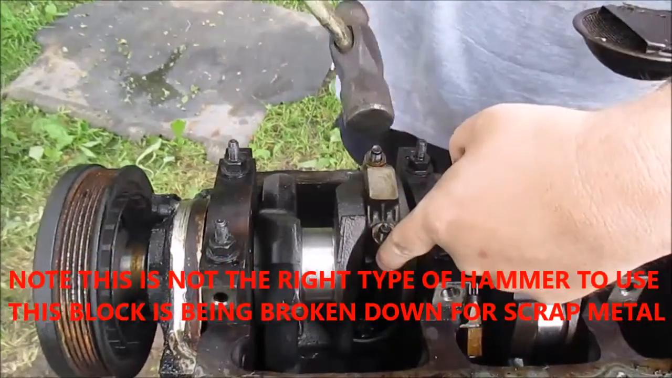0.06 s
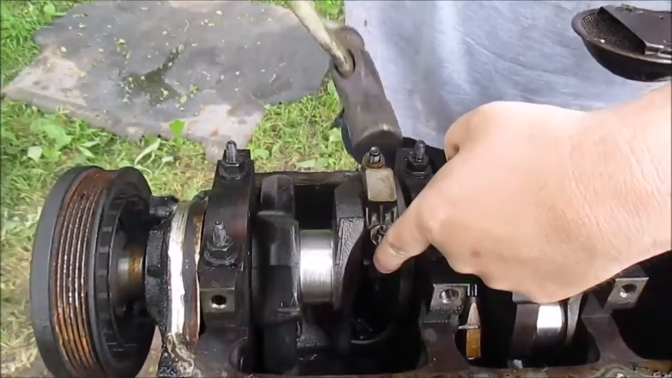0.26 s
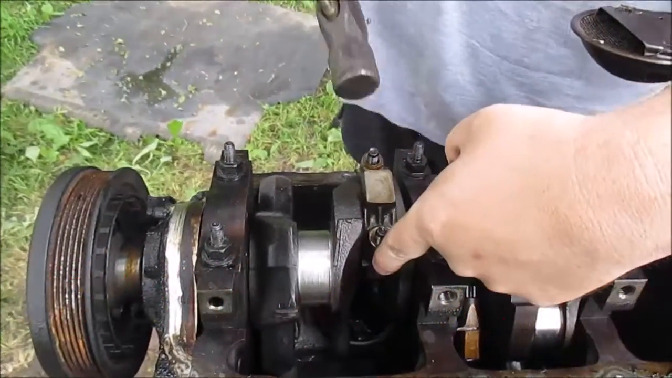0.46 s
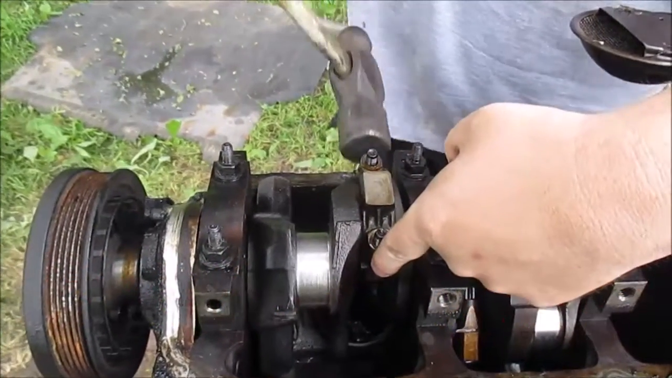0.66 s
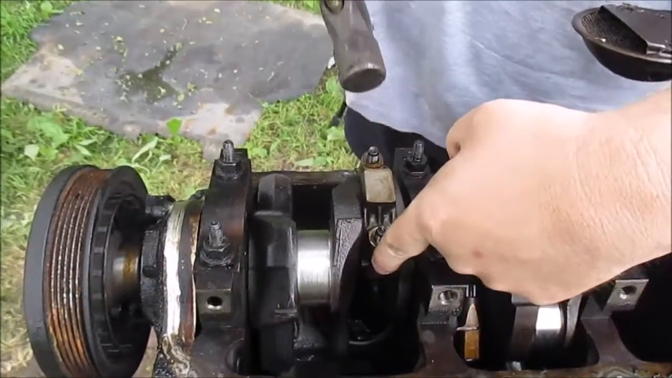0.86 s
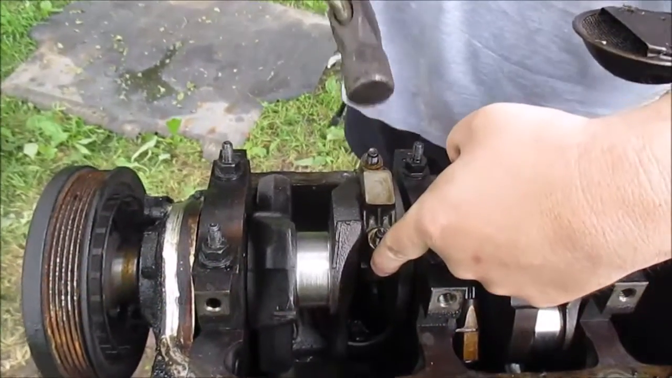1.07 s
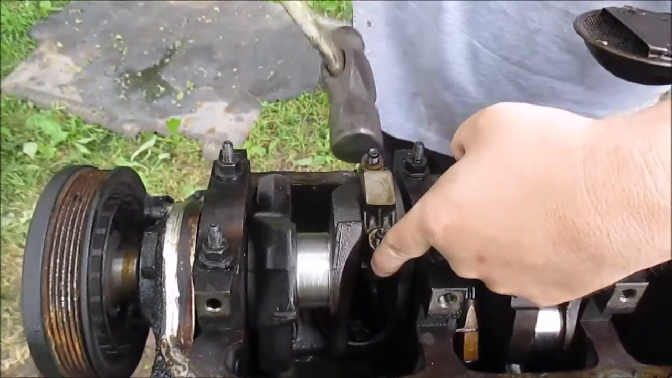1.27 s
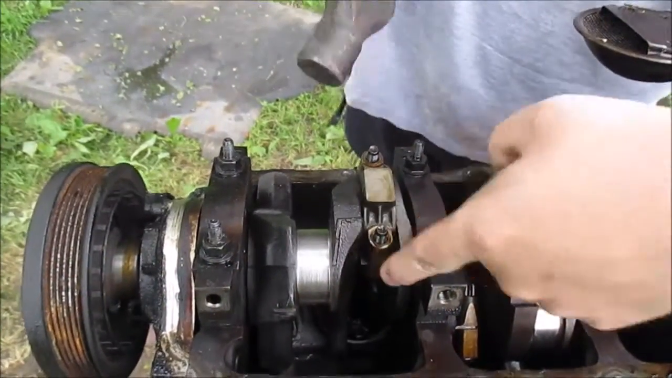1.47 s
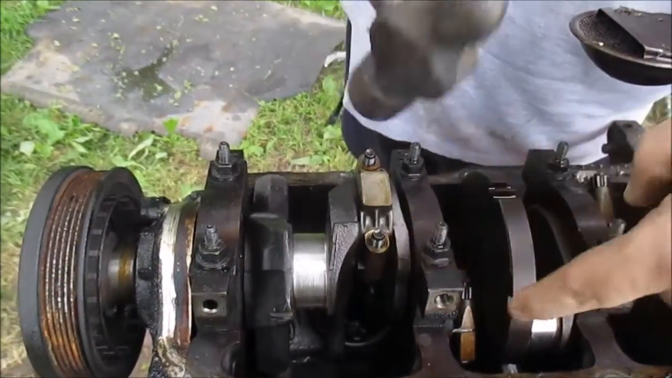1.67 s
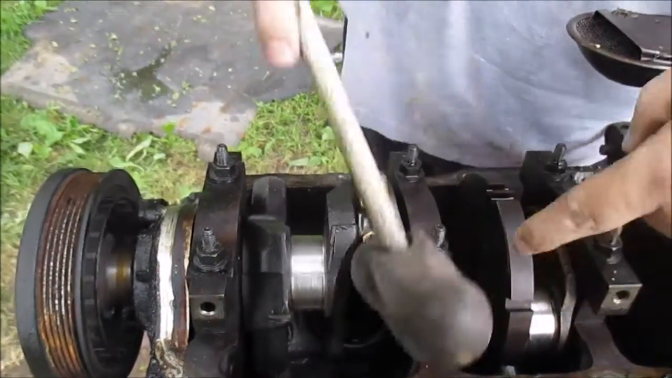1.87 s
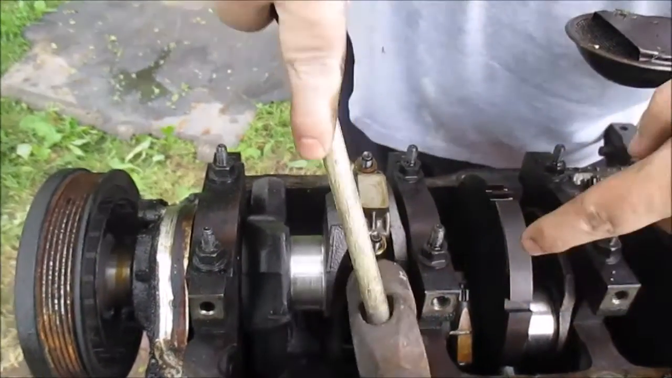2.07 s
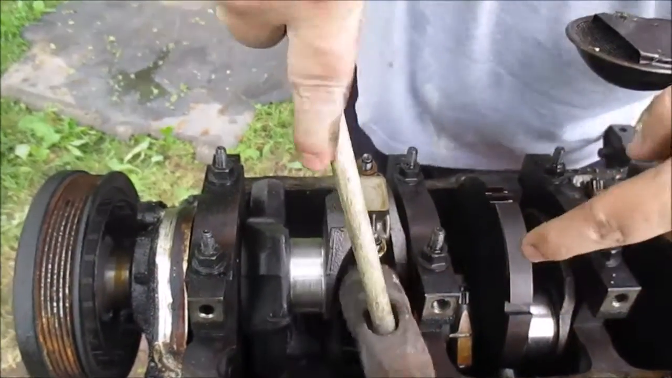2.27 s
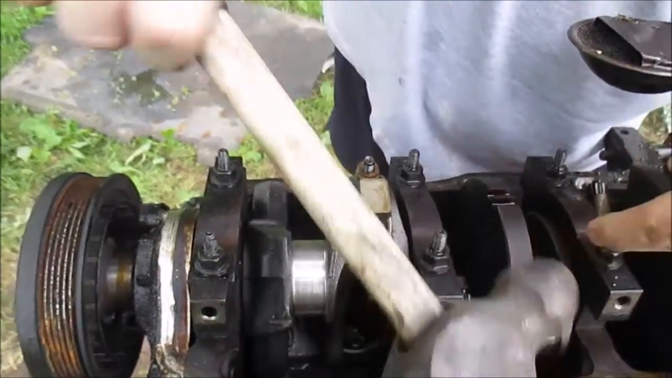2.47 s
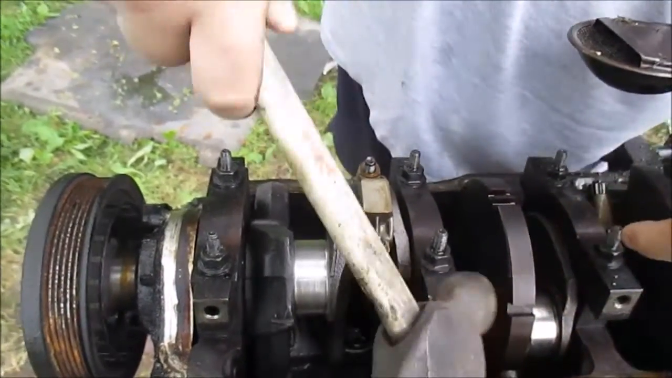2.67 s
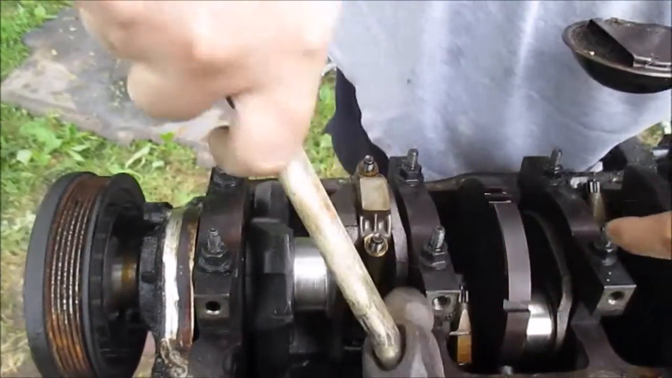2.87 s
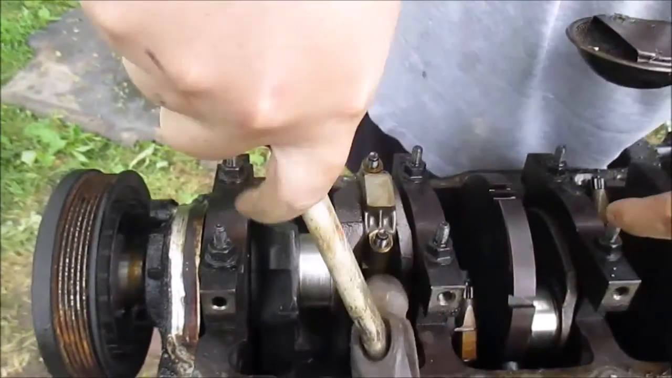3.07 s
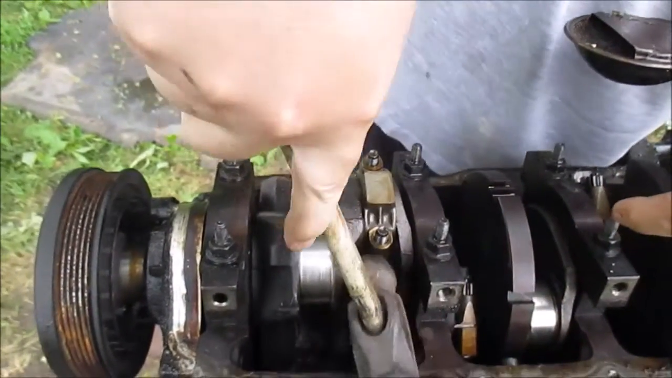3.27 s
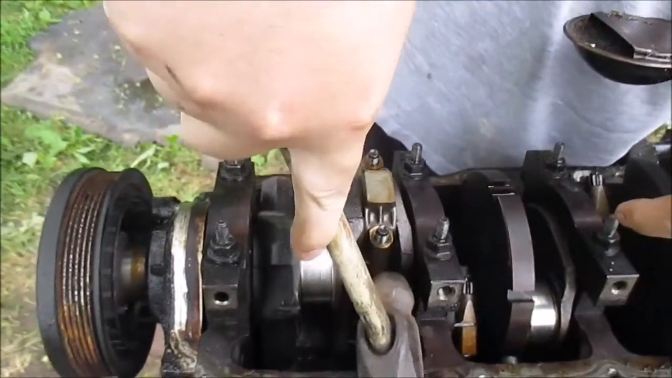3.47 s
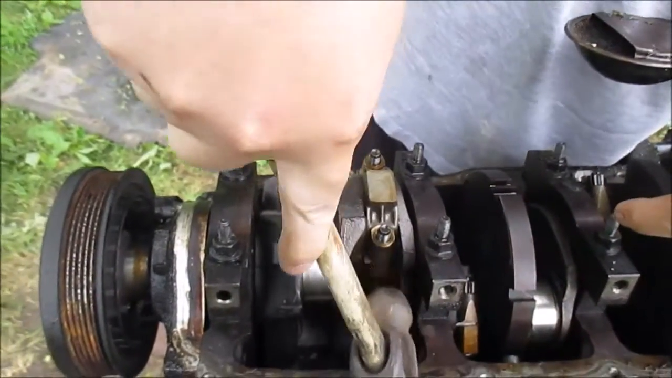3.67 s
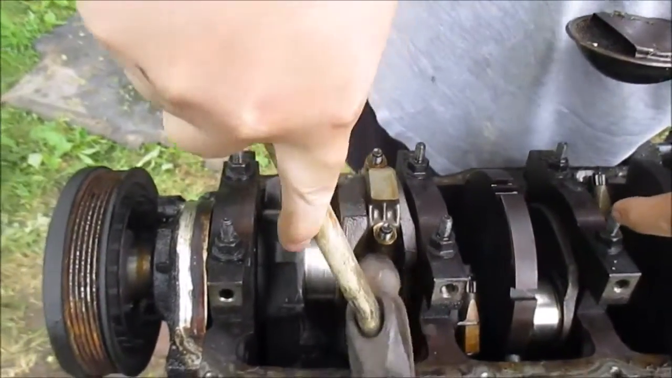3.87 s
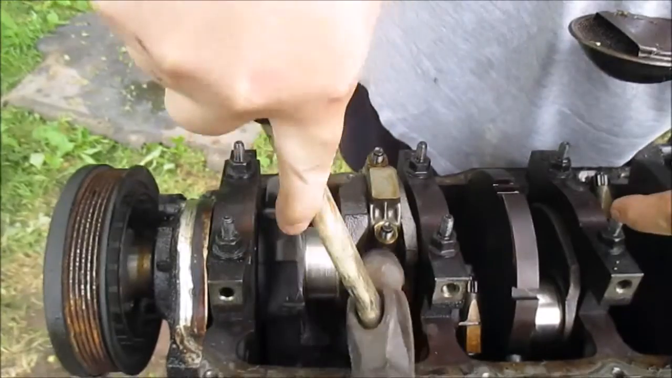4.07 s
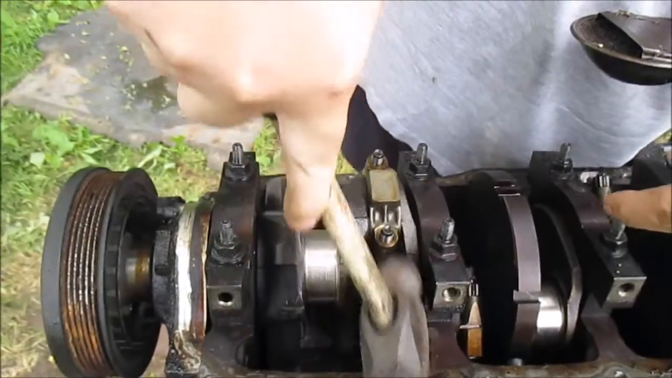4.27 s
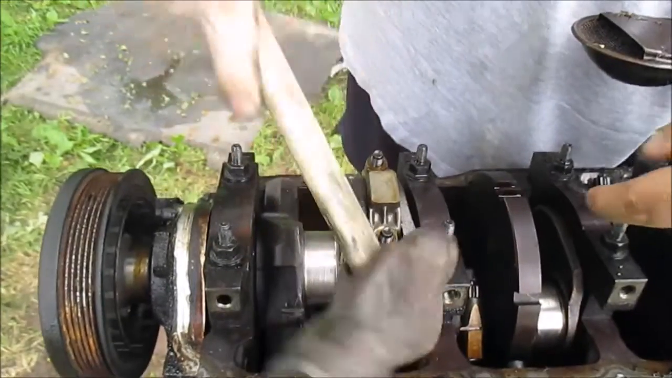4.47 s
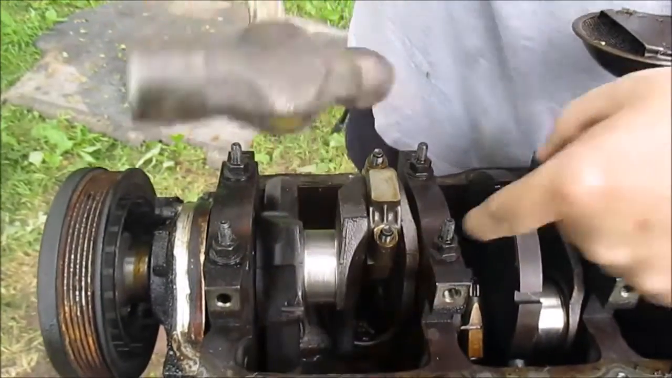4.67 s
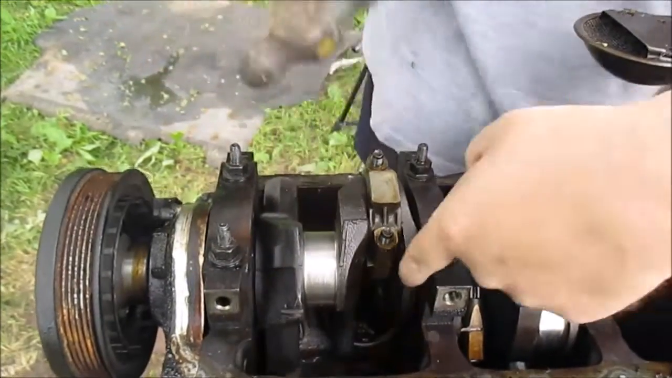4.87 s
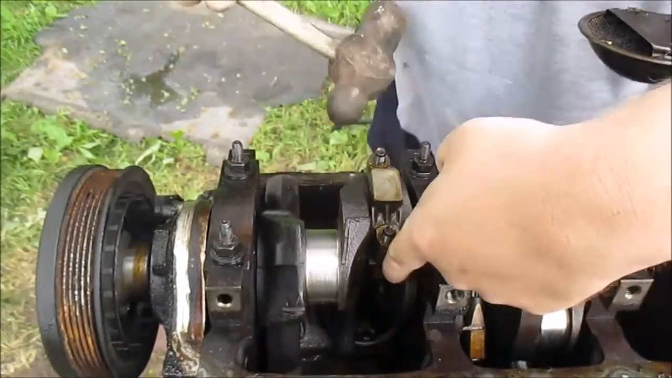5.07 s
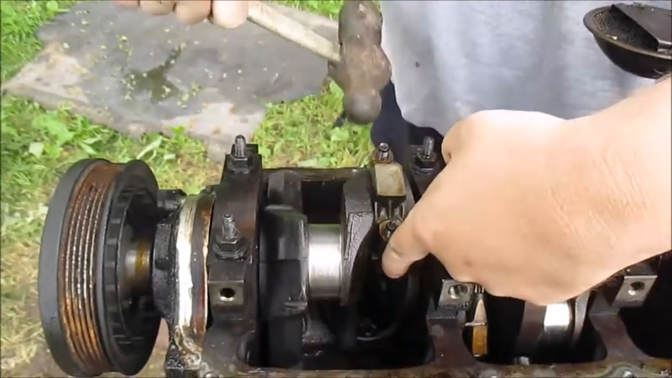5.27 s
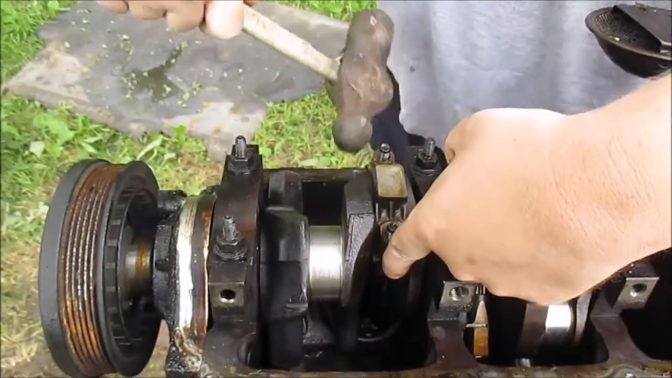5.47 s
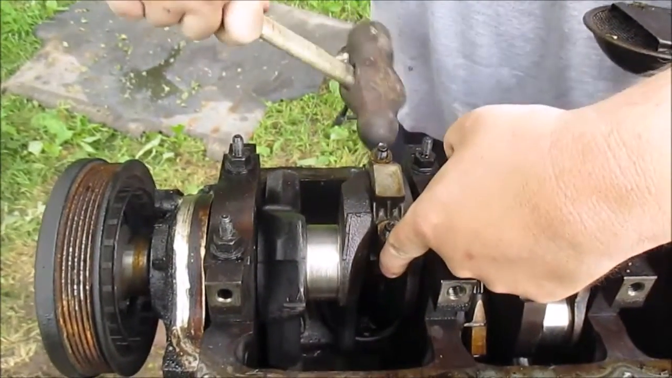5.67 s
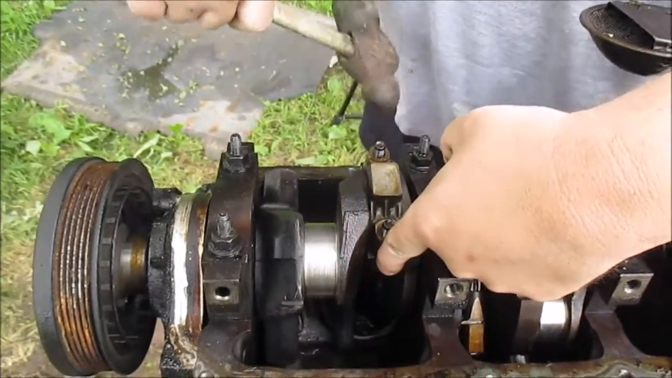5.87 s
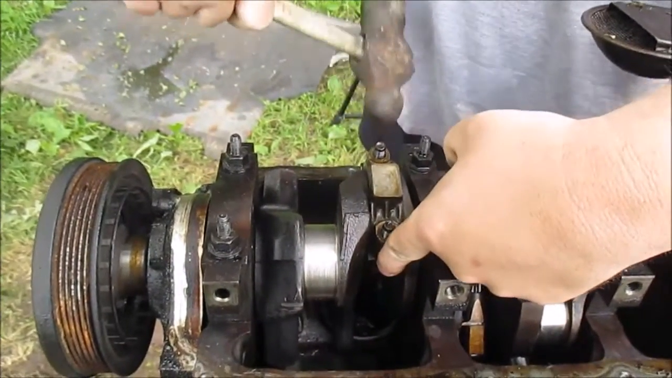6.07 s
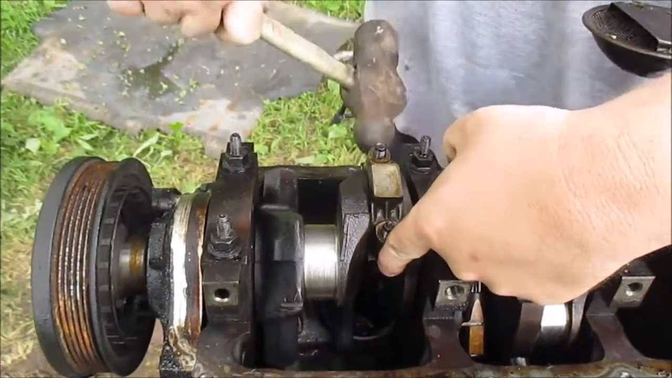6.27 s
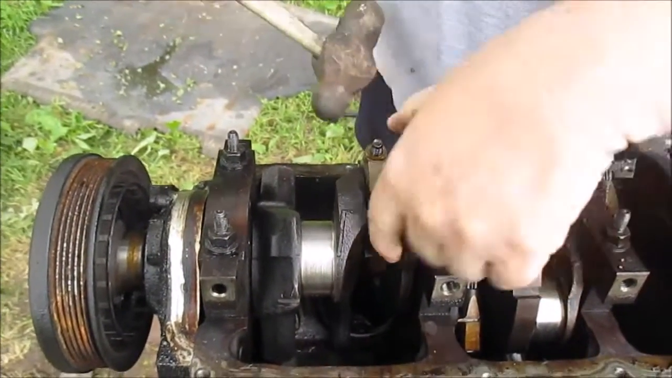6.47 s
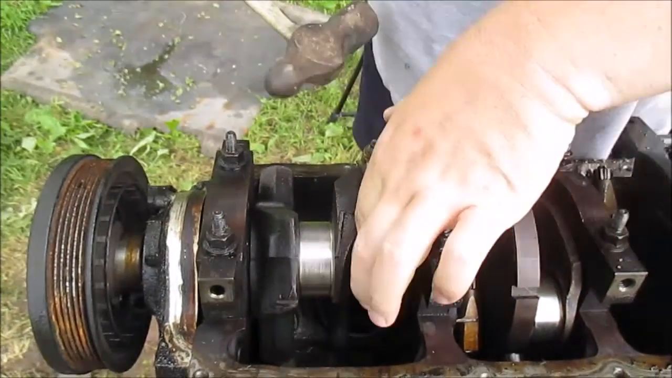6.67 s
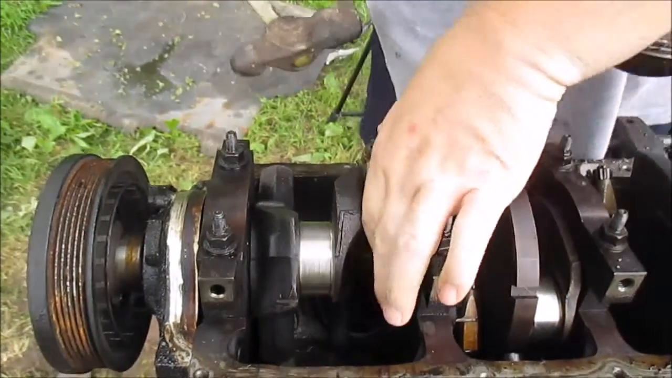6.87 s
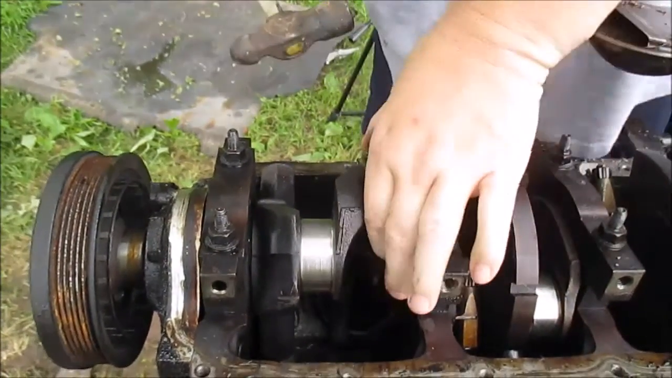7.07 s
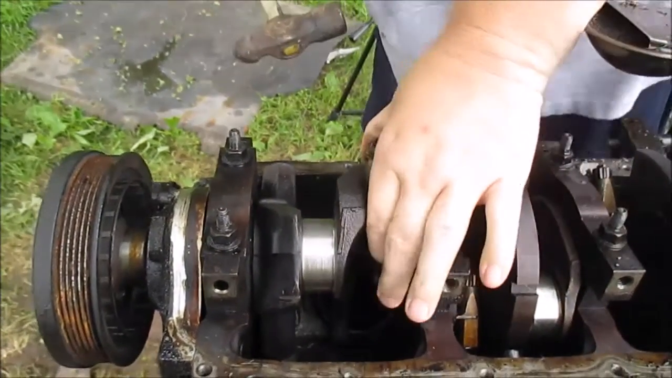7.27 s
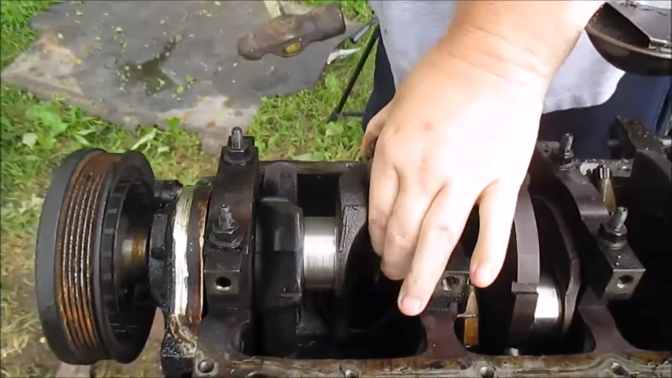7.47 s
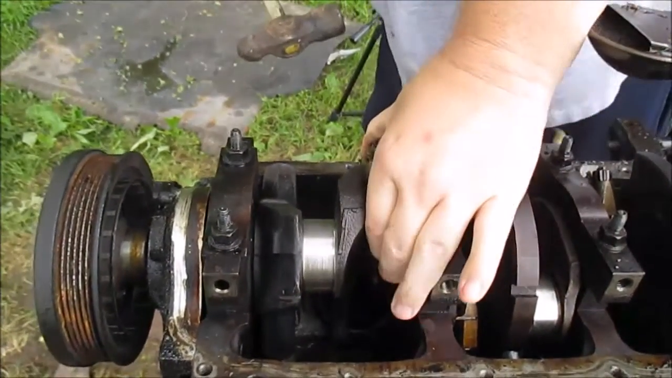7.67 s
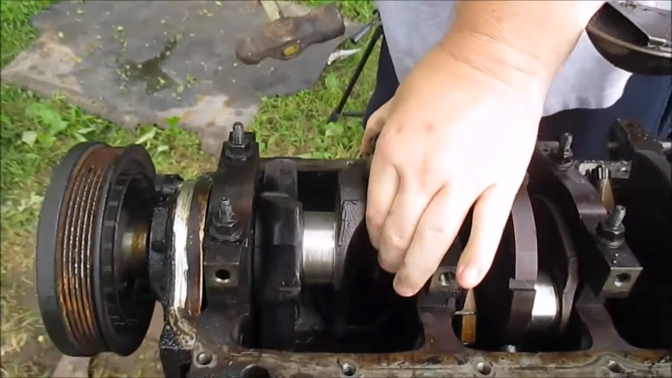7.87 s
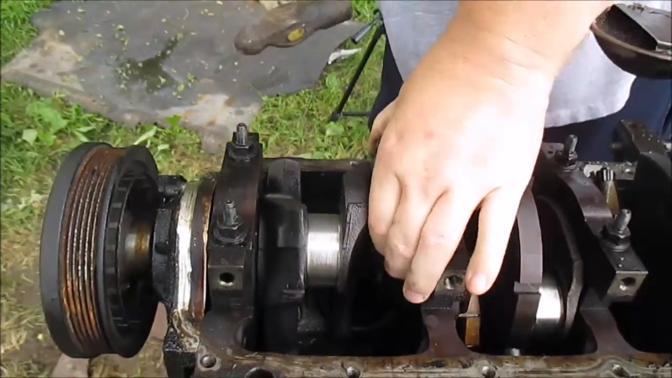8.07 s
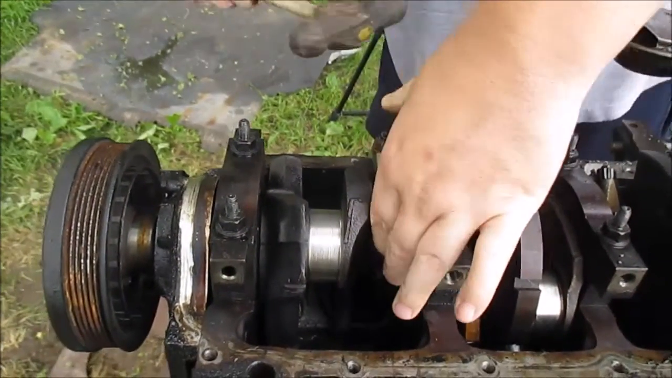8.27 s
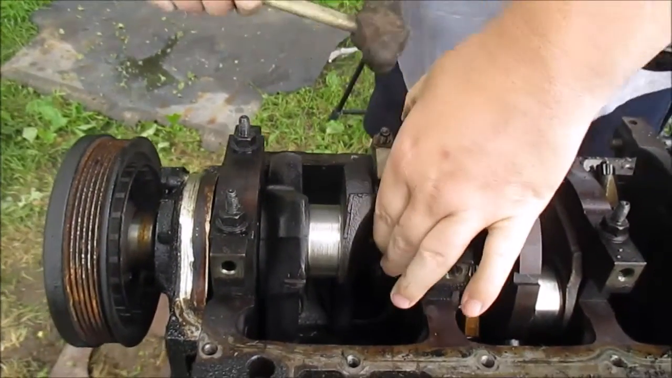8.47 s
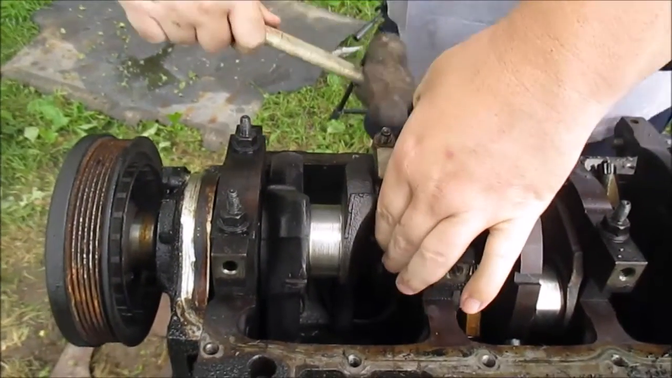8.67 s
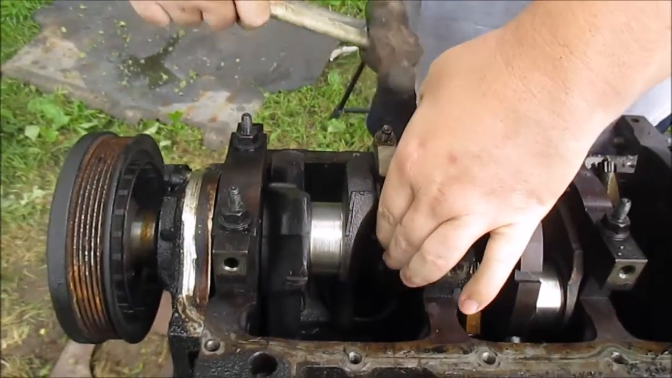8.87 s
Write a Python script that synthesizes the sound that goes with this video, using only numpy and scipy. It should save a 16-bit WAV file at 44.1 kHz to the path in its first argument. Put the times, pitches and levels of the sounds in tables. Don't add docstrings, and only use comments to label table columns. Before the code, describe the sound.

Short, dead metallic knocks of hammer on heavy iron, each a hard crack with a brief chattering tail and a faint thin ring. They arrive in evenly paced runs separated by pauses, varying from bright to thuddy. Soft hiss and rumble of distant traffic duck after the blows and creep back up; a faint bird whistles near the end. Close mono microphone, open air, no echo.

```python
import sys
import numpy as np
from scipy import signal
from scipy.io import wavfile
from scipy.ndimage import uniform_filter1d

SR = 44100
rng = np.random.default_rng(int(sys.argv[2]) if len(sys.argv) > 2 else 0)


def unload_audio(sound):
    columns = np.transpose(np.atleast_2d(sound))
    steps = np.round(np.clip(columns, -1, 1) * 32767)
    wavfile.write(sys.argv[1], SR, steps.astype(np.int16))


def makeup_ratio(level_db):
    decades = np.asarray(level_db, float) / 20
    return 10 ** decades


N = 392931


def rms_one(x):
    return x / np.sqrt(np.mean(x ** 2) + 1e-20)


def at_hz(points, hz, column=1):
    points = np.array(points)
    return np.interp(np.log(hz), np.log(points[:, 0]), points[:, column])


def drift(rate_hz):
    r = np.exp(-80 * np.pi * rate_hz / SR)
    slow = signal.lfilter([1], [1, -2 * r, r * r], rng.standard_normal(N // 40 + 2002))
    slow = slow[2000:]
    return np.interp(np.arange(N) / 40, np.arange(len(slow)), rms_one(slow))


def cut(x, order, hz, kind="low"):
    return signal.sosfilt(signal.butter(order, hz, kind, fs=SR, output="sos"), x)


def resonator(hz, r):
    return [1, -2 * r * np.cos(2 * np.pi * hz / SR), r * r]


def narrow_noise(hz, width_hz):
    r = np.exp(-np.pi * width_hz / SR)
    return rms_one(signal.lfilter([1, 0, -1], resonator(hz, r), rng.standard_normal(N)))


def banded_noise(spectrum, patchy_db):
    edges = np.geomspace(spectrum[0][0], spectrum[-1][0], 16)
    out, white = 0, rng.standard_normal((2, N))
    for k, (low, high) in enumerate(zip(edges, edges[1:])):
        narrow = cut(white[k % 2], 2, [low, high], "band")
        narrow = cut(narrow, 2, [low * .8, high * 1.2], "band")
        level_db = at_hz(spectrum, np.sqrt(low * high)) + patchy_db * drift(3.4)
        out = out + makeup_ratio(level_db) * narrow
    return rms_one(out)


def gain_control():
    start_db, floor_db, creep_db_per_s = -41.5, -56, 5
    duck_from_db, duck_per_db, duck_most_db = -3, 4, 6.5
    level_db = start_db + creep_db_per_s * np.arange(N) / SR
    for start_s, peak_db, *_ in sorted(row for rows in BLOWS.values() for row in rows):
        at = round(start_s * SR)
        step_db = np.clip(duck_per_db * (peak_db - duck_from_db), 0, duck_most_db)
        level_db[at:] -= min(step_db, max(level_db[at] - floor_db, 0))
    return uniform_filter1d(level_db, size=SR // 100)


# pitch_hz, level_db_per_hz
TRAFFIC = [(260, -6), (340, 0.5), (500, -3.5), (800, -7), (1150, -8), (1500, -17.5), (1800, -16),
           (2400, -19.5), (3900, -19.5), (4800, -33), (6500, -32.5), (8000, -45.5), (10000, -54),
           (15000, -67.5)]
# pitch_hz, level_db_per_hz
RUMBLE = [(12, -42), (20, -11), (32, -9), (81, 2), (134, -8.5), (221, -1.5), (240, -6), (258, -12),
          (330, -11.5), (430, -46.5), (730, -120)]
# pitch_hz, width_hz, level_db
DRONE = [(81.5, 23, -9), (166.4, 4.7, -9.5), (218.7, 5.8, -11.5)]
# pitch_hz, width_hz, level_db
INSECT = (11800, 40, -47)
# time_s, hiss_db, rumble_db (below 130 Hz), drone_db (above 130 Hz)
SWELL = [(0, 0.6, 2, 5.5), (.45, -1.1, -1.5, 4), (.9, .1, 0.8, 3), (1.3, -1.1, -3.5, 1.3),
         (1.6, -0.1, 1.2, 5.5), (2.3, 1, -0.7, 5), (2.75, 0.1, 5, 1.5), (3.1, 0, -1.2, 2.5),
         (3.599, -0.1, 4, -1.5), (4.1, .6, 3.5, 1.5), (4.7, 2.1, 3.5, 2), (5.1, 1.5, 5, -1.5),
         (5.55, 1.1, 5, 2.7), (6.1, 0.9, 1.5, -1.5), (6.501, 0.3, 5, 0.5), (7.6, -1.1, 2.1, -0.2),
         (8.4, -1.15, 0, 0.8), (8.91, -1.2, -0.5, 1)]


def yard():
    hiss = banded_noise(TRAFFIC, patchy_db=0.5)
    hiss = cut(hiss, 4, 9000)
    insect_hz, insect_width_hz, insect_db = INSECT
    hiss = hiss + makeup_ratio(insect_db) * narrow_noise(insect_hz, insect_width_hz)

    rumble = banded_noise(RUMBLE, patchy_db=1.0)
    for hz, width_hz, level_db in DRONE:
        rumble = rumble + makeup_ratio(level_db) * narrow_noise(hz, width_hz)
    low = rms_one(cut(rumble, 4, 130))
    high = rms_one(cut(rumble, 4, 130, "high"))

    time_s, *swell_db = np.transpose(SWELL)
    t = np.arange(N) / SR
    hiss_gain, low_gain, high_gain = (makeup_ratio(np.interp(t, time_s, db)) for db in swell_db)
    return makeup_ratio(gain_control()) * (hiss_gain * hiss + low_gain * low + high_gain * high)


# pitch_hz, level_db, t60_s
BLOCK = [(325, -9, 0.089), (398, -13, 0.063), (488, -6, 0.33), (609.3, -0.5, 0.099), (719, -3, 0.092),
         (872, -6, 0.073), (997, -4.5, 0.074), (1105, -12.5, 0.3), (1393, -3, 0.051), (1473, -4, 0.016),
         (1700, -4.5, 0.085), (1775, -10, 0.044), (1960, 2.5, 0.018), (2330, -10.5, 0.078),
         (2275, -7.5, 0.065), (2470, -18, .06), (2637, -0.5, 0.012), (2775, -2.5, 0.073), (3260, -3, 0.068),
         (3800, -13, .075), (3580, -7, 0.021), (3700, -7, .035), (4140, -17, 0.029), (5330, -16, 0.015),
         (5000, -15, 0.017)]
# pitch_hz, level_db, t60_s
HEAD = [(5750, -22, .05), (6700, -17, .06), (7224, -22, .08), (7720, -17, .06), (8630, -16, .06)]


def ring(t, own_hz, lasting, head_db, head_hz):
    head = []
    for hz, level_db, t60_s in HEAD:
        favour_db = 4 if hz == head_hz else -5
        head.append((hz, level_db + head_db + favour_db, t60_s))
    own = [(hz, 5.0, 0.031) for hz in own_hz]
    modes = np.array(BLOCK + head + own)
    hz, level_db, t60_s = modes.T[:, :, None]
    chance = rng.standard_normal((4, len(modes), 1))
    hz = hz * (1 + .015 * chance[3])
    t60_s = np.minimum(t60_s * makeup_ratio(1.5 * np.minimum(chance[2], .7)), .095)
    decay = makeup_ratio(level_db + 3.0 * chance[0] - 60 * t / (lasting * t60_s))
    rings = decay * np.sin(2 * np.pi * hz * t) * np.sign(chance[1])
    settle = makeup_ratio(-4.0) + np.exp(-t / .004)
    return modes[:, 0], rings * settle


# pitch_hz, level_db_per_hz, crack_t60_s, tail_t60_s
SCATTER = [(304, -6, 0.061, 0.57), (601.8, 1, .035, 0.31), (1200, -3.5, 0.058, 0.15),
           (2430, -1.5, 0.015, 0.075), (4000, 3, 0.015, 0.11), (6140, -5, 0.011, 0.052),
           (8900, -11.5, 0.0049, 0.021), (12000, -9, 0.0022, 0.023), (15300, -18.5, 0.0052, .02)]


def scatter(t, low, high, white, rattle, lasting, tail_db):
    contact_s, crack_db = .0017, 12.0
    out = 0
    edges = np.geomspace(low, high, 4)
    for k, (a, b) in enumerate(zip(edges, edges[1:])):
        mid = np.sqrt(a * b)
        hold_s = contact_s * min(1, 3300 / mid) ** 0.95
        released = np.maximum(t - hold_s, 0)
        crack = makeup_ratio(crack_db - 60 * released / at_hz(SCATTER, mid, column=2))
        tail = makeup_ratio(tail_db - 60 * t / (lasting * at_hz(SCATTER, mid, column=3)))
        noise = cut(white[k % 2] * (crack + tail * rattle), 2, [a, b], "band")
        out = out + makeup_ratio(at_hz(SCATTER, mid)) * noise
    return out


RANGES_HZ = (250, 800, 1600, 3600, 6500, 9500, 16800)


def blow(range_db, peak_db, own_hz, lasting, head_db, head_hz, tail_db):
    t = np.arange(SR // 4) / SR
    mode_hz, rings = ring(t, own_hz, lasting, head_db, head_hz)
    white = rng.standard_normal((2, len(t)))
    steps = np.arange(0, t[-1] + .003, .003)
    rattle = makeup_ratio(2.2 * np.interp(t, steps, rng.standard_normal(len(steps))))
    rise = np.minimum(t / .0001, 1)
    sound = 0
    for low, high, weight_db in zip(RANGES_HZ, RANGES_HZ[1:], range_db):
        layer = rings[(mode_hz >= low) & (mode_hz < high)].sum(axis=0)
        layer = layer + scatter(t, low, high, white, rattle, lasting, tail_db)
        layer = cut(rise * layer, 5, high * 1.1)
        loudest = np.sqrt(np.max(uniform_filter1d(layer ** 2, size=SR // 150)))
        sound = sound + makeup_ratio(weight_db) * layer / loudest
    sound = cut(sound, 2, 230, "high")
    return makeup_ratio(peak_db) * sound / np.max(np.abs(sound))


# pitch_hz, level_db, t60_s
PULLEY = (1830, -52.5, 1.0)


def pulley(nudges):
    hz, level_db, t60_s = PULLEY
    r = makeup_ratio(-60 / (t60_s * SR))
    strike = [0, np.sin(2 * np.pi * hz / SR)]
    return makeup_ratio(level_db) * signal.lfilter(strike, resonator(hz, r), nudges + 1e-18)


BLOWS = { "rod bolt": [(.2987, 1.5, -14.5, -16, 2910), (.6490, 4, -10, -8.5, 3214),
         (.9769, 2.33, -6.5, -11.5, 3277), (1.2727, 1.4, -10.5, -14.5, 2880)],
         "web edge": [(2.1579, -8, 5, -25, 1700), (3.7953, 0.5, -3, -14.5, 2664)],
         "crank web": [(3.1941, -9, -2.5, -36, 1634), (3.5338, -1.8, -13, -20.5, 2690),
         (4.0790, -3.5, -6, -26, 2340), (4.3325, -1, -6.5, -17, 1670)],
         "rebound": [(3.2478, -21, -19, -42, 2410), (3.6578, -17.5, 4.5, -42, 2420)],
         "rod cap": [(5.3990, -4, -15, -16, 3080), (5.7266, -0.3, -13, -12.5, 3100),
         (6.0062, -1.5, -6, -8, 2930), (6.2623, -1.5, -5, -10, 3265)],
         "loose cap": [(7.7096, -31, -8, -21, 1894), (7.8283, -40, -3, -10, 1880)],
         "loose bolt": [(5.4345, -33, -16, -31, 2830), (8.0096, -40, -9.5, -30, 2640)],
         "far bolt": [(8.7406, 0, -6, -18.5, 1952)]}
PARTS = {"rod bolt": (1199, 4749.5, -2.5, -3.5, -1.5), "web edge": (1336, 3845.5, -0.3, -3, -18),
         "loose bolt": (828, 3904, -3, 0.5, -6), "crank web": (886, 3891, -3.5, -6.5, -10),
         "rebound": (1120.5, 3756, 2.5, -32, -3), "rod cap": (1197.5, 4899, -1, -2.5, -9.5),
         "loose cap": (1403, 3944, 12, -10.5, -8), "far bolt": (1185.5, 4037, -1.5, -4, -2.5)}
ANSWER = {"rod bolt": (-8.5, -3.5, -7), "web edge": (-6, -4.5, -3.5), "loose bolt": (-22, 0.5, -4.5),
          "crank web": (3.5, -3, -9), "rebound": (-20, -11, -7.5), "rod cap": (-4, -1.507, -8),
          "loose cap": (-22, -7, -8), "far bolt": (2, -1.8, -11)}
FAVOURED_HZ = {"rod bolt": 6700, "web edge": 6700, "loose bolt": 5750, "crank web": 7224, "rebound": 5750,
               "rod cap": 7720, "loose cap": 5750, "far bolt": 8630}


def hammer():
    out, nudges = np.zeros(N + SR), np.zeros(N)
    for part, rows in BLOWS.items():
        low_hz, high_hz, knock_db, bite_db, sparkle_db = PARTS[part]
        head_db, tail_db, pulley_db = ANSWER[part]
        for start_s, peak_db, thud_db, edge_db, spot_hz in rows:
            knock = knock_db + .2 * (thud_db + 7)
            sparkle = sparkle_db + 1.1 * edge_db - 10.5
            range_db = [thud_db - 3.5, knock, 0, bite_db, edge_db, sparkle]
            lasting = .93 - .004 * peak_db
            free_head_db = head_db - 2.5 * max(peak_db, -4)
            at = round(start_s * SR)
            out[at:at + SR // 4] += blow(range_db, peak_db, (low_hz, spot_hz, high_hz), lasting,
                                         free_head_db, FAVOURED_HZ[part], tail_db)
            nudges[at] = makeup_ratio(peak_db + pulley_db)
    return out[:N] + pulley(nudges)


# start_s, end_s, from_hz, to_hz, level_db
BIRD = [
    (8.46, 8.53, 6750, 6550, -72),
    (8.56, 8.63, 6650, 6800, -70),
    (8.4, 8.55, 4750, 4450, -70),
    (8.52, 8.74, 4400, 4900, -68),
]


def bird():
    t, out, waver = np.arange(N) / SR, 0, drift(29.6)
    for start_s, end_s, from_hz, to_hz, level_db in BIRD:
        along = np.clip((t - start_s) / (end_s - start_s), 0, 1)
        hz = from_hz + (to_hz - from_hz) * along + 25 * waver
        swell = np.sqrt(4 * along * (1 - along))
        whistle = np.sin(2 * np.pi * np.cumsum(hz) / SR)
        out = out + makeup_ratio(level_db + 2.4 * waver) * swell * whistle
    return out


def scene():
    return (yard() + hammer() + bird())[None]


def band_limit(x):
    return signal.sosfilt(signal.butter(12, 16360, fs=SR, output="sos"), x)


def record(dry):
    clipped = np.clip(dry, -1, 1)
    top_cut = signal.cheby2(8, 40, 16600, fs=SR, output="sos")
    mix = signal.sosfilt(top_cut, clipped)
    return band_limit(mix)


dry = scene()
out = record(dry)
unload_audio(out)
```